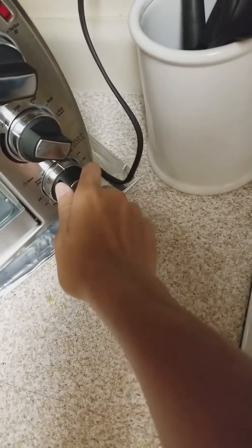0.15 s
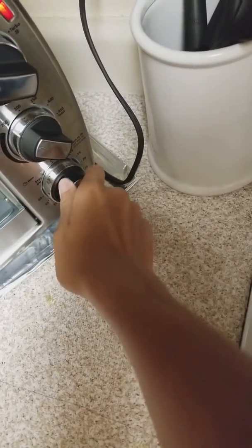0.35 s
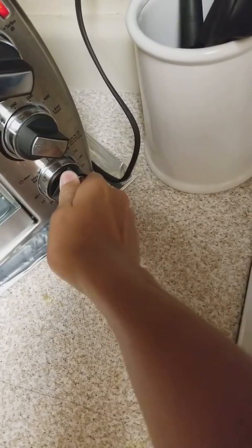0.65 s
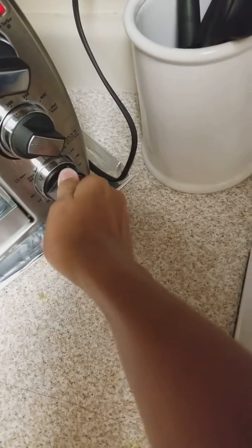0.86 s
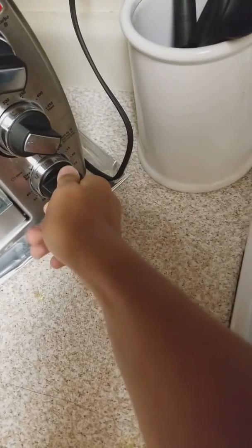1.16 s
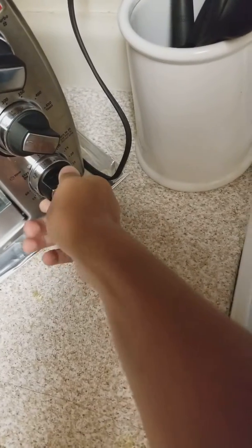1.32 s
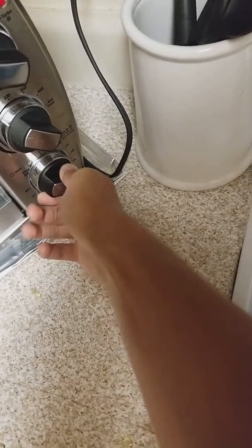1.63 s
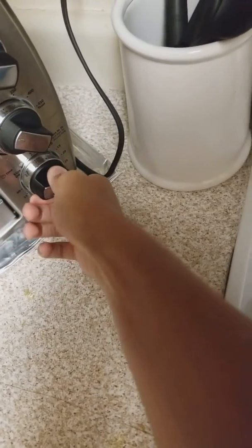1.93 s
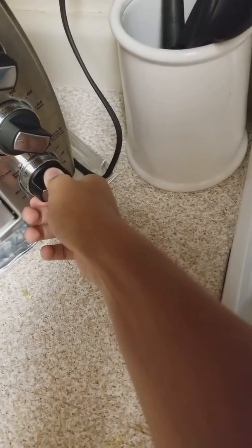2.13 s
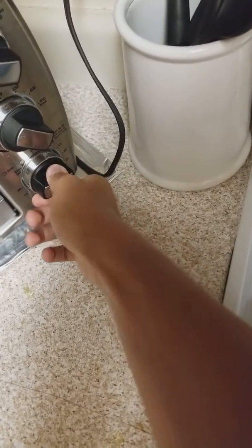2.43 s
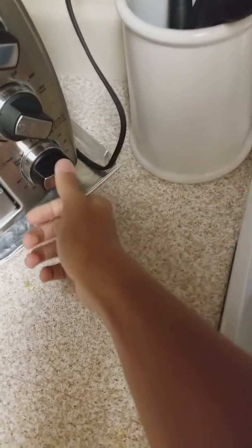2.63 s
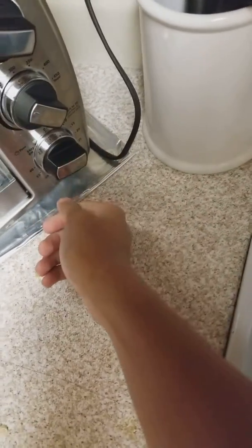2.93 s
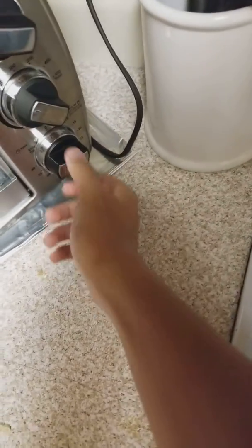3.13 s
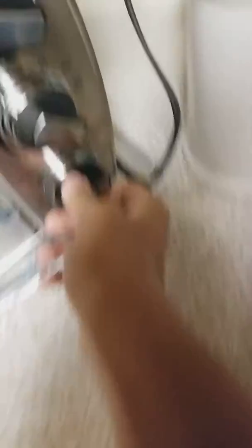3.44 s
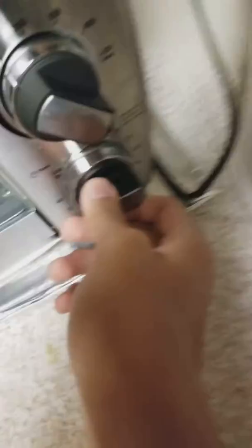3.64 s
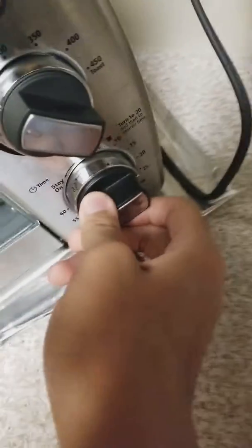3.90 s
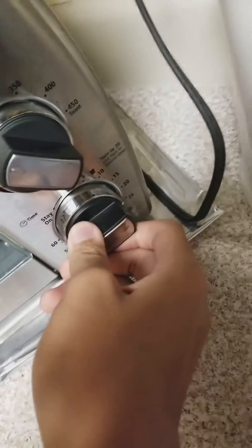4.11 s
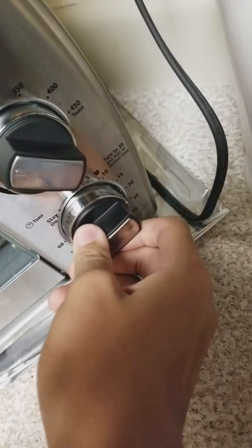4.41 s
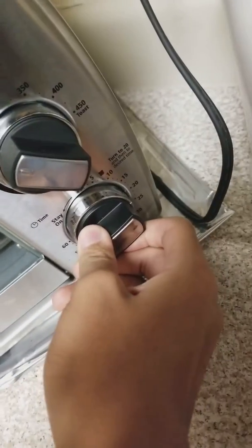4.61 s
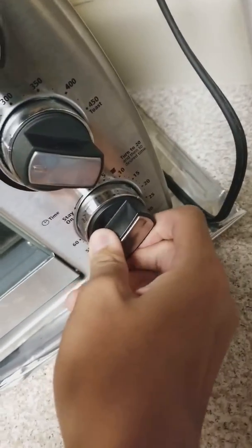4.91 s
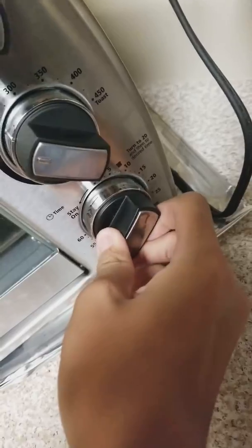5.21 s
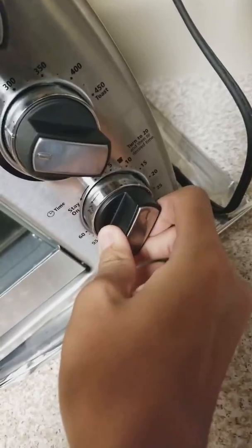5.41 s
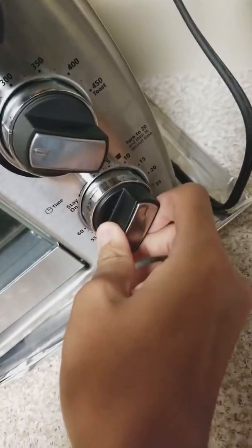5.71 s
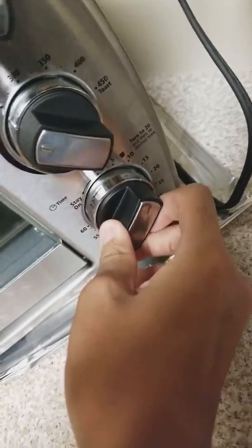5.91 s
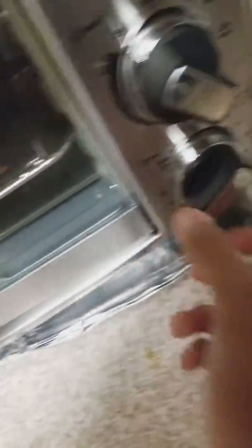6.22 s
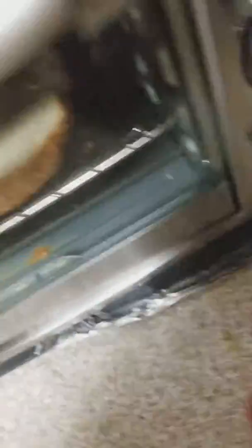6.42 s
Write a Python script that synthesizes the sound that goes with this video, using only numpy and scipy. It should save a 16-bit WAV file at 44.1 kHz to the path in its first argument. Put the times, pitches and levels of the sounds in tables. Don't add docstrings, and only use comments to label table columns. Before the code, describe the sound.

A continuous low appliance hum, compressor around 50 Hz with 120 Hz mains, fills a kitchen with a faint whine, rumble and soft hiss. At 0.3 s a hand pushes a timer knob with soft low bumps, and gear teeth whirr, grainy and metallic, until 0.7 s; a second, longer whirr follows at once, swelling slightly until it cuts off near 1.55 s. Two quick clicks at 1.6 s start the escapement: dry, bright ticks in a hollow steel case, roughly every 0.23 s, fainter from 2.5 to 3.3 s. A light tap at 3.32 s and loud nail crack at 3.36 s precede skin rubbing plastic from 3.53 to 3.9 s. The phone is now close, and ticks are strong until 5.9 s, slightly faster. A right-leaning parting tap and tiny rub come at 6.08 s; the last ticks are weak, to 6.55 s, over the unbroken hum.

```python
import sys
import numpy as np
from scipy import signal
from scipy.fft import rfft, irfft, next_fast_len
from scipy.io import wavfile
from scipy.ndimage import uniform_filter1d, map_coordinates

SR = 44100
rng = np.random.default_rng(int(sys.argv[2]) if len(sys.argv) > 2 else 0)


def attenuation_scalar(level_db):
    decades = np.asarray(level_db, float) / 20
    return 10 ** decades


def wav_out(sig):
    wavfile.write(sys.argv[1], SR, np.round(np.clip(np.atleast_2d(sig).T, -1, 1) * 32767).astype(np.int16))


N = 288855

# (time [s], level [dB])
WINDING = [
    [(.309, -46), (.373, -35), (.427, -39.5), (.487, -38), (.57, -41), (.649, -39.5), (.703, -46.5)],
    [(.704, -47.5), (.767, -41), (1.0, -42), (1.03, -37.5), (1.07, -40.5), (1.141, -43), (1.519, -38.5),
     (1.563, -49), (1.6, -61)],
]
# (frequency [Hz], level [dB per Hz])
GEARS = [(410, -27), (700, -9.5), (1200, -15.5), (1640, -9), (1890, -2), (2510, -9), (2720, -7.5),
         (8350, -16), (10300, -19.5), (13200, -17), (14800, -31), (15800, -52)]


def winding():
    efforts = [curves(turn, outside=-120)[0] for turn in WINDING]
    whirr_db = np.max(efforts, axis=0)
    usual_whirr_db, bright_db, duller_per_db = -39, -3.5, -0.3
    treble_db = bright_db - duller_per_db * np.maximum(whirr_db - usual_whirr_db, 0)

    contacts = grains(1800, spread_db=2.0, t60=0.056)
    through_case = filtered(contacts, lambda hz: panel(hz, GEARS, lift=0.87))
    teeth = patchy(through_case, depth_db=0.76)

    def low_pass(hz):
        return 1 / (1 + (hz / 3800) ** 4)

    low = unit(filtered(teeth, low_pass))
    high = unit(filtered(teeth, lambda hz: 1 - low_pass(hz)))
    wheel_turns = (np.arange(N) / SR - 0.387) / 0.1
    wheel_db = 1.5 * np.cos(2 * np.pi * wheel_turns)
    surge_db = 0.7 * wobble(40)
    return attenuation_scalar(whirr_db + 3 + surge_db) * (attenuation_scalar(wheel_db) * low + attenuation_scalar(treble_db + 0.5) * high)


# (time [s], peak level [dB], plate ring [Hz], second plate ring [Hz])
TICKS = [(1.604, -30.5, 1740, 6140), (1.6264, -29.5, 1870, 6030), (1.6714, -37, 1630, 6640),
         (1.8277, -31.5, 2100, 3760), (2.0549, -28.5, 2320, 4440), (2.2896, -29, 2020, 3730),
         (2.5236, -39, 1720, 4440), (2.7586, -40, 2040, 3780), (3.0002, -38.5, 1610, 3530),
         (3.2354, -39, 1610, 3270), (3.4258, -35, 1610, 3830), (3.474, -30, 1730, 3790),
         (3.7032, -27, 2170, 3680), (3.933, -26, 2140, 3220), (4.1582, -24.5, 1910, 5770),
         (4.375, -28, 2050, 3780), (4.583, -27, 1820, 4850), (4.5866, -25.5, 1690, 3700),
         (4.801, -25.5, 2070, 6360), (5.0122, -27, 1630, 4480), (5.2259, -25.5, 2050, 3200),
         (5.4252, -27, 2050, 5500), (5.6443, -25, 1730, 6450), (5.8509, -27.5, 1990, 4770),
         (6.071, -37, 2410, 4600), (6.3006, -39, 2230, 3270), (6.534, -39, 1480, 3680)]
# (frequency [Hz], level [dB per Hz])
PALLET = [(530, -41), (900, -11), (1600, 2.5), (2470, -0.5), (2710, -2), (3660, -7.5), (4030, -7),
          (5990, -7), (6750, -9), (8380, -11), (9450, -3), (13700, -3), (15800, -15)]
# (frequency [Hz], width [Hz], lift [dB])
WORKS = [(2050, 190, -8), (3780, 99, -9), (5990, 390, -9.5), (8300, 430, -0.5), (12700, 1200, -5)]
# (frequency [Hz], time to fall 60 dB [s])
CAVITY = [(1500, 0.093), (3000, 0.27), (3800, 0.2), (4800, 0.13), (5900, 0.17), (7000, 0.13), (8400, 0.15),
          (10500, 0.086), (13000, 0.15)]
# (frequency [Hz], time to fall 60 dB [s])
KITCHEN = [(1500, 0.8), (5000, 0.72), (13000, 0.12)]


def escapement():
    size, lead = 16384, 512
    usual_tick_db = -32
    out = np.zeros((2, N + size))
    for s, db, plate_hz, second_hz in TICKS:
        burst = tail(CAVITY, size, attack=0.0012)
        burst += attenuation_scalar(4.0) * tail([(1500, 0.06), (12000, 0.013)], size, attack=0.00043)
        burst += attenuation_scalar(-14) * tail(KITCHEN, size, attack=0.008)
        unlocking = attenuation_scalar(-12.5) * tail(CAVITY, size, attack=0.00045)
        beat = np.roll(burst, lead, axis=1) + np.roll(unlocking, lead - round(0.006 * SR), axis=1)

        low_db = -4.5 - 0.39 * (db - usual_tick_db)
        high_db = -15.5 - 0.3 * (db - usual_tick_db)
        tilt = [(1500, low_db), (2600, low_db), (3600, 0), (8000, 0), (10000, high_db + 8.5)]

        def shape(hz):
            plates = 1 + 1.14 * resonance(hz, plate_hz, width_hz=50)
            plates = plates + 1.84 * resonance(hz, second_hz, width_hz=87)
            frame = sum(attenuation_scalar(lift_db) * resonance(hz, c, w) for c, w, lift_db in WORKS)
            return panel(hz, PALLET, lift=0.24) * attenuation_scalar(along(tilt, hz)) * (plates + frame)

        start = round(s * SR) - lead
        out[:, start:start + size] += attenuation_scalar(db + 1.5) * filtered(beat, shape)
    return out[:, :N] * attenuation_scalar(1.17 * wobble(500))


# (time [s], level [dB])
RUB = [
    [(3.325, -56), (3.34, -52), (3.357, -56)],
    [(3.53, -62), (3.54, -43.5), (3.556, -40), (3.602, -50.5), (3.67, -45), (3.7, -46.5), (3.8, -51.5),
     (3.83, -58), (3.9, -55)],
    [(6.03, -60), (6.06, -56), (6.095, -50), (6.105, -60)],
]
# (frequency [Hz], level [dB per Hz])
SKIN = [(1500, -32), (2200, -4), (2700, -2), (3800, -9.5), (5500, -10), (9000, -45)]
SIZZLE = [(4000, -16), (7000, -10), (10000, -4), (12500, 1.5), (15000, -11), (16000, -20)]


def fingers():
    skin = grains(900, spread_db=-1.0, t60=0.064)
    grip_hz = np.array([[3700], [2700]])

    def hand(hz):
        return panel(hz, SKIN, lift=0.34) * (1 + 1.8 * resonance(hz, grip_hz, width_hz=600))

    body = patchy(filtered(skin, hand), depth_db=-0.5)
    sizzle = unit(filtered(skin, lambda hz: attenuation_scalar(along(SIZZLE, hz))))
    lean_db = np.array([[1.5], [4]])
    usual_rub_db = -46.5
    out = 0
    for stroke in RUB:
        body_db = curves(stroke, outside=-120)[0]
        sizzle_db = usual_rub_db - 3 + 1.74 * (body_db - usual_rub_db)
        out = out + attenuation_scalar(body_db + 0.5) * body + attenuation_scalar(sizzle_db + lean_db) * sizzle
    return out


# (time [s], peak level [dB], pitch [Hz], left-right difference [dB], swing-up time [s])
TAPS = [
    (3.3207, -43, 4200, 10, 0.00039),
    (3.3606, -20, 2430, 2, 0.00081),
    (6.0798, -23.5, 3010, -11, 0.00046),
]
# (ratio to the tap pitch [-], level [dB])
KNOB = [(.68, -10), (.85, 9), (1.02, 3), (1.15, -11), (1.5, -5)]


def taps():
    out, t = np.zeros((2, N)), np.arange(4096) / SR
    shade = (1.24, 0.86)
    usual_tap_db = -21
    for s, db, hz, pan_db, rise in TAPS:
        mode_time = np.outer(shade, t - 1.29 * rise)
        ring = sum(attenuation_scalar(level_db - 8.0) * np.sin(2 * np.pi * hz * ratio * mode_time)
                   for ratio, level_db in KNOB)
        swing = attenuation_scalar(-60 * t / (0.0029 + 5.8 * rise)) * (1 - np.exp(-(t / rise) ** 2))

        crack = attenuation_scalar(-60 * t / (0.0015 + 3 * rise)) * rng.standard_normal((2, len(t)))
        crack = filtered(crack, lambda f: 1 / (1 + (f / 12500) ** 8))
        crack_db = -5 - 0.47 * (db - usual_tap_db)
        snap = swing * ring + attenuation_scalar(crack_db) * crack
        echo = signal.fftconvolve(snap, tail(CAVITY, 4096, attack=0.0013), axes=1)
        wet = attenuation_scalar(-52) * echo[:, :len(t)]

        for ear, sign in enumerate((1, -1)):
            start = round((s - 0.0006 * ear) * SR)
            heard = attenuation_scalar(db + 7.5 + sign * pan_db / 2) * snap[ear] + attenuation_scalar(db) * wet[ear]
            out[ear, start:start + len(t)] += heard
    return out


# (time [s], peak level [dB], pitch [Hz], time to fall 60 dB [s])
BUMPS = [
    (.365, -30.5, 157, 0.21),
    (0.402, -43, 240, 0.24),
    (0.49, -32, 790, 0.049),
    (.38, -40, 470, 0.073),
    (3.3605, -26, 525, 0.025),
    (3.3596, -27, 935, 0.016),
]


def bumps():
    out, t = np.zeros(N), np.arange(8192) / SR
    for s, db, hz, t60 in BUMPS:
        start = round(s * SR)
        swell = 1 - np.exp(-t * hz / 0.91)
        out[start:start + len(t)] += attenuation_scalar(db - 60 * t / t60) * np.sin(2 * np.pi * hz * t) * swell
    return out


SHAFT_HZ = 51.755
# (multiple [-], level against the leader [dB], left-right difference [dB], left lead [rad])
LOW_ORDERS = [(1, 0, -.2, -.07), (2, -8, .4, .02), (3, -22, 0, -.24)]
MID_ORDERS = [(4, 2, 2.9, -.35), (5, -18, 1.8, -2)]
HIGH_ORDERS = [(8, 3, 0.5, 0.31), (9, -10, 10, 0.41), (16, -34, -9, -1)]
MAINS_ORDERS = [(1, 0, .7, -.09), (2, -18, .6, -.49)]
# (over the counter [dB], drawn back [dB], close to the knob [dB], at the oven door [dB])
SHAFT_DB = (-36.5, -37.5, -36.5, -38)
MAINS_DB = (-38.5, -39, -36, -39.5)
FOURTH_DB = (-44, -47, -45, -51)
EIGHTH_DB = (-59.5, -53.5, -53, -55)


def hum():
    t, out = np.arange(N) / SR, np.zeros((2, N))
    side = np.array([[0.5], [-0.5]])
    groups = [
        (SHAFT_HZ, here(SHAFT_DB), LOW_ORDERS, 0.4),
        (SHAFT_HZ, here(FOURTH_DB), MID_ORDERS, 1.2),
        (SHAFT_HZ, here(EIGHTH_DB), HIGH_ORDERS, 1.5),
        (120.0, here(MAINS_DB), MAINS_ORDERS, 0.6),
        (69.47, -55, [(1, 0, 0, -0.09)], 1.1),
    ]
    for hz, level_db, orders, flutter_db in groups:
        for multiple, db, pan_db, lead in orders:
            phase = 2 * np.pi * (multiple * hz * t + rng.random()) + 0.34 * wobble(1.614)
            loudness = attenuation_scalar(level_db + db + side * pan_db + flutter_db * wobble(4.1))
            out += np.sqrt(2) * loudness * np.sin(phase + side * lead)
    return out


# (over the counter [dB], drawn back [dB], close to the knob [dB], at the oven door [dB])
TWELFTH_DB = (-63, -65, -56.5, -54.5)
WHISTLE_DB = (-62, -59.5, -57.5, -59)
TWENTIETH_DB = (-56.5, -59, -62, -73)


def whine():
    t, whistle_hz = np.arange(N) / SR, 730.4
    band = [(whistle_hz - 40, -40), (whistle_hz - 10, 0), (whistle_hz + 10, 0), (whistle_hz + 40, -40)]
    out = attenuation_scalar(here(WHISTLE_DB) + 2) * rush(band)
    for order, levels_db in ((12, TWELFTH_DB), (20, TWENTIETH_DB)):
        drift = 0.3 * np.array([wobble(3), 2 + wobble(3)])
        drift = drift + 0.6 * wobble(5) + 0.05 * order * wobble(9)
        loudness = attenuation_scalar(here(levels_db) + 2.5 + 1.4 * wobble(4.97))
        out = out + loudness * np.sin(2 * np.pi * order * SHAFT_HZ * t + drift)
    return out


# (frequency [Hz], level [dB per Hz])
RUMBLE = [(15, -2), (35, -3), (52, 8), (68, 5.5), (80, 1), (112, 9), (140, 6.5), (185, -0.5), (207, 9),
          (225, 0), (290, -0.5), (400, -3), (700, -16.5), (1100, -34)]
HISS = [(350, -12.5), (600, -5), (1100, -5.5), (1620, -7.5), (2030, -9.5), (2300, -13.5), (3000, -14),
        (5500, -26.5), (7800, -21), (10600, -29), (12400, -22), (14400, -35), (15200, -44), (16000, -55)]
# (over the counter [dB], drawn back [dB], close to the knob [dB], at the oven door [dB])
RUMBLE_DB = (-52, -52.5, -51, -50)
HISS_DB = (-55, -56, -55, -57.5)


def air():
    rumble = attenuation_scalar(here(RUMBLE_DB) + 8.5 + 0.44 * wobble(3.65)) * rush(RUMBLE)
    hiss = attenuation_scalar(here(HISS_DB) + 9 + 1.04 * wobble(7)) * patchy(rush(HISS), depth_db=1.0)
    return rumble + hiss


# (frequency [Hz], likeness [-1 to 1])
ALIKE = [(60, 0.95), (130, 1), (290, 0.67), (640, 0.33), (1410, -0.11), (3100, -0.0042), (6820, 0.0061),
         (15000, -0.12)]


def rush(spectrum):
    def mid_and_side(hz):
        angle = np.arccos(np.clip(along(ALIKE, hz), -1, 1)) / 2
        return attenuation_scalar(along(spectrum, hz)) * np.array([np.cos(angle), np.sin(angle)])

    mid, side = filtered(rng.standard_normal((2, N)), mid_and_side)
    return unit(np.array([mid + side, mid - side]))


# (frequency [Hz], time to fall 60 dB [s])
PATH = [(1000, 0.041), (12000, 0.016)]


def grains(per_second, spread_db, t60):
    power = (rng.random(N) < per_second / SR) * attenuation_scalar(2 * spread_db * rng.exponential(size=N))
    fading = attenuation_scalar(-120 * np.arange(4096) / SR / t60)
    swarm = np.sqrt(np.abs(signal.fftconvolve(power, fading)[:N]))

    path = rfft(tail(PATH, 4096, attack=0.00034))
    path = irfft(path / np.abs(path) ** 0.75)
    path = path / np.linalg.norm(path, axis=1)[:, None]
    shared = signal.fftconvolve([swarm * rng.standard_normal(N)], path, axes=1)[:, :N]
    return shared + attenuation_scalar(-0.5) * swarm * rng.standard_normal((2, N))


# (frequency [Hz], width [Hz], lift [dB])
CASE = [(1295, 100, 11), (1610, 65, 7.5), (1752, 20, 8), (1906, 28, 5), (2030, 62, 2.5), (2170, 41, 2.5),
        (2290, 21, 7.5), (2686, 59, 4.5), (3560, 40, -3), (3870, 18, 7), (4480, 17, 4), (5470, 14, -7),
        (6030, 100, 3), (6830, 62, -13), (8150, 160, 3), (8550, 180, 2.5), (12200, 150, 0), (13750, 200, 8)]


def panel(hz, spectrum, lift):
    ringing = sum(attenuation_scalar(db) * resonance(hz, c, w) for c, w, db in CASE)
    return attenuation_scalar(along(spectrum, hz)) * (1 + lift * ringing)


def resonance(hz, centre_hz, width_hz):
    return 1j * hz * width_hz / (centre_hz ** 2 - hz ** 2 + 1j * hz * width_hz)


def tail(decays, size, attack):
    hz, t, z = signal.stft(rng.standard_normal((2, size)), SR, nperseg=128)
    z = z * attenuation_scalar(-60 * t / along(decays, hz)[:, None])
    fading = signal.istft(z, SR, nperseg=128)[1][:, :size]
    return fading * (1 - np.exp(-np.arange(size) / SR / attack))


# (time [s], place [0 counter, 1 drawn back, 2 close to the knob, 3 oven door])
PHONE = [(0, 0.17), (.6, .02), (1.5, 0.25), (2.4, 0.56), (3.15, 0.86), (3.4, 1.84), (3.9, 2.08),
         (5.4, 2.04), (6.05, 1.7), (6.35, 2.8), (6.55, 2.9)]


def here(levels_db):
    return np.interp(curves(PHONE)[0], np.arange(len(levels_db)), levels_db)


def patchy(x, depth_db):
    z = signal.stft(x, nperseg=512)[2]
    field = uniform_filter1d(rng.standard_normal(z.shape[1:]), size=5, axis=0)
    field = uniform_filter1d(field, size=12, axis=1)
    return unit(signal.istft(z * attenuation_scalar(depth_db * unit(field)), nperseg=512)[1][:, :N])


def unit(x):
    return x / np.sqrt(np.mean(x ** 2) + 1e-20)


def along(points, hz):
    f, v = np.transpose(points)
    return np.interp(np.log(hz + 1), np.log(f + 1), v)


def curves(rows, outside=None):
    s, *cols = np.transpose(rows)
    return [np.interp(np.arange(N) / SR, s, c, outside, outside) for c in cols]


def wobble(rate):
    knots = rng.standard_normal(int(N * rate / SR) + 4)
    return map_coordinates(knots, [np.arange(N) * rate / SR])


def filtered(x, response):
    n = x.shape[-1]
    m = next_fast_len(n + 8192)
    return irfft(rfft(x, m) * response(np.fft.rfftfreq(m, 1 / SR)), m)[..., :n]


def scene():
    handling = winding() + escapement() + fingers() + taps() + bumps()
    return handling + hum() + whine() + air()


# (frequency [Hz], left-right difference [dB])
LEAN = [(50, .9), (300, 1), (700, 0), (1400, -2), (2800, 0), (5500, .7), (10000, -2.7), (14000, -3.6)]


def microphones(sound):
    side = np.array([[0.5], [-0.5]])
    return filtered(sound, lambda hz: attenuation_scalar(side * along(LEAN, hz)) * (hz < 15980))


def top_cut(x):
    return signal.sosfilt(signal.butter(12, 15980, fs=SR, output="sos"), x)


def record(dry):
    mix = microphones(dry)
    return top_cut(mix)


dry = scene()
out = record(dry)
wav_out(out)
```